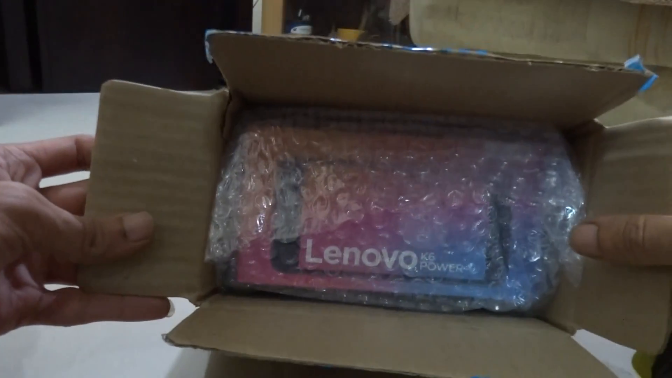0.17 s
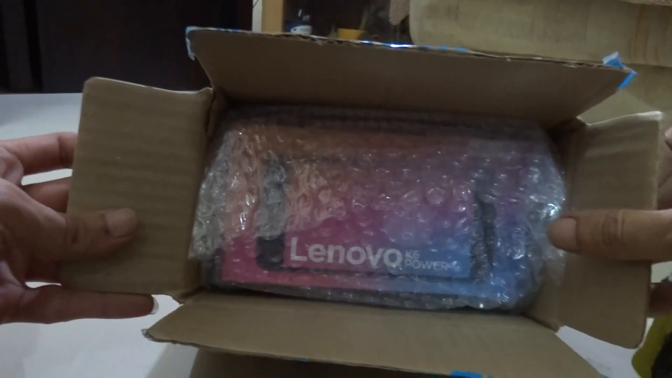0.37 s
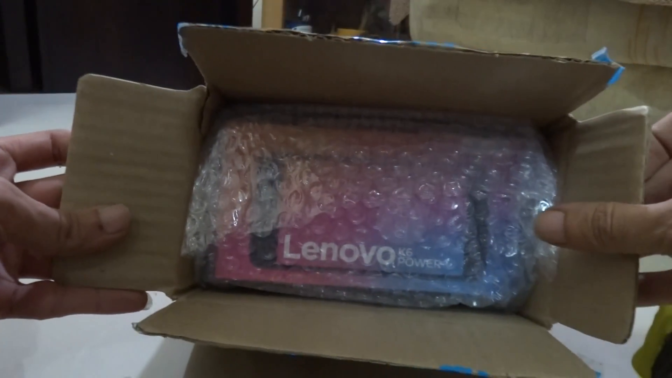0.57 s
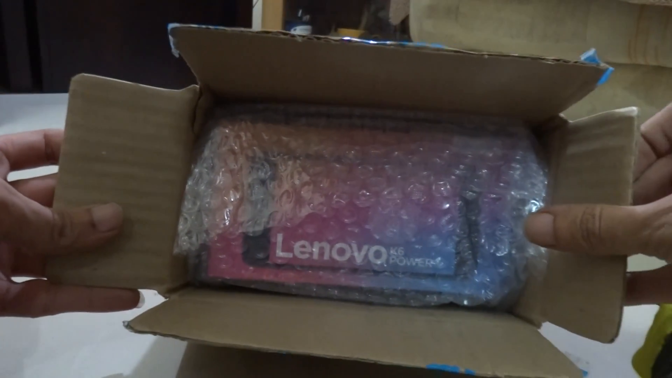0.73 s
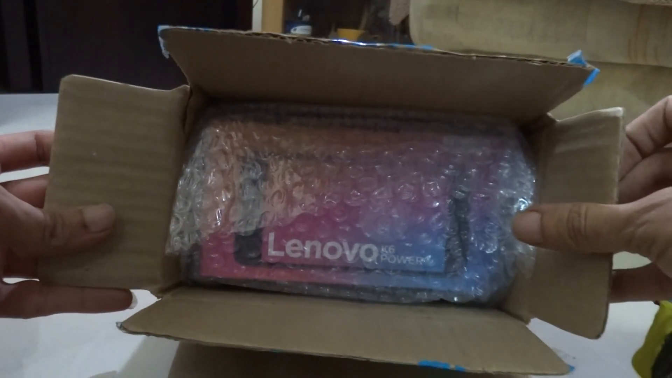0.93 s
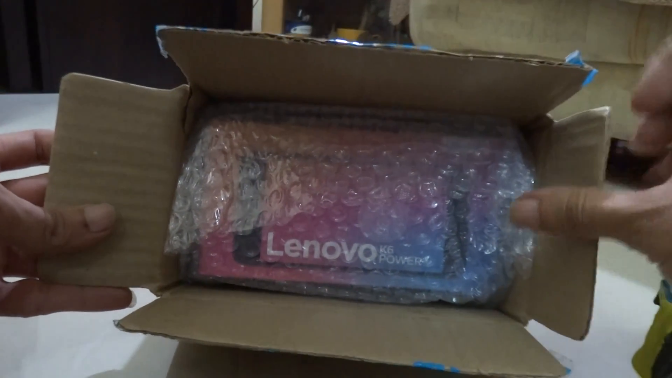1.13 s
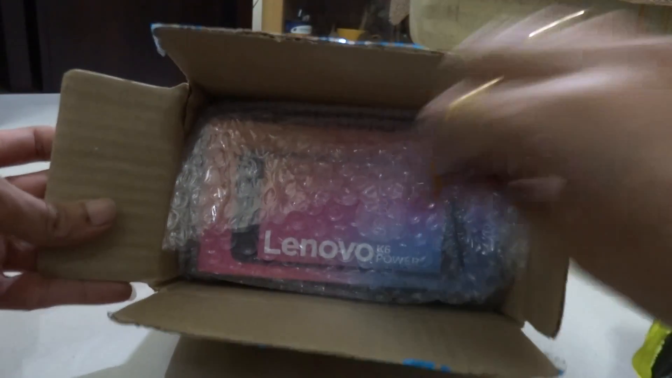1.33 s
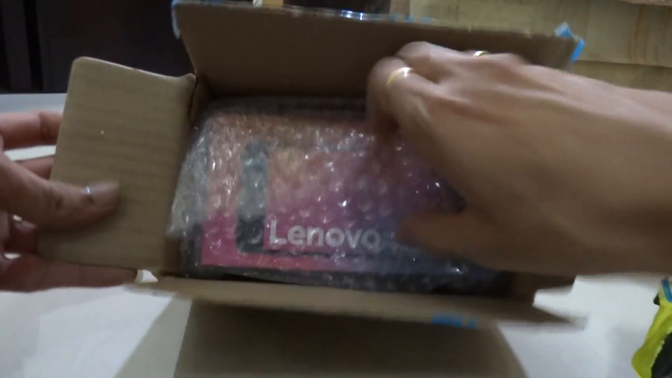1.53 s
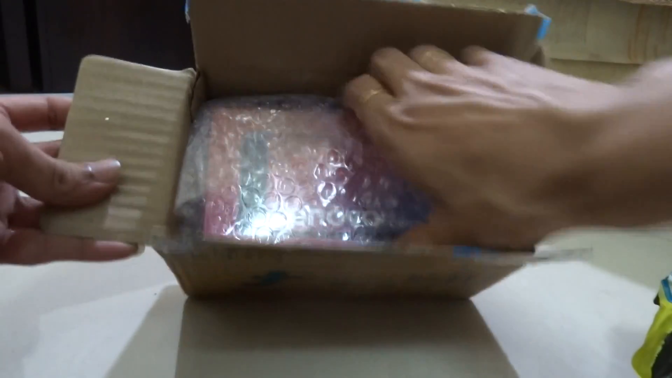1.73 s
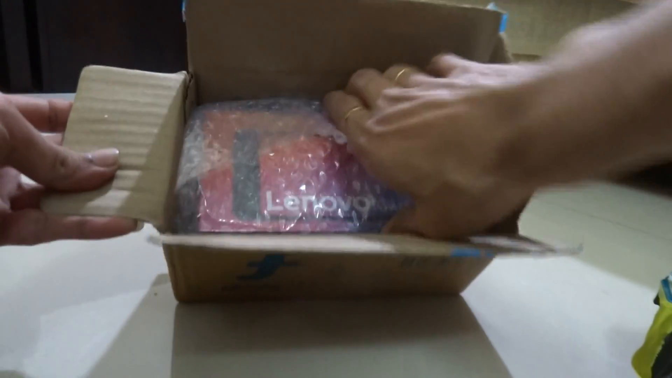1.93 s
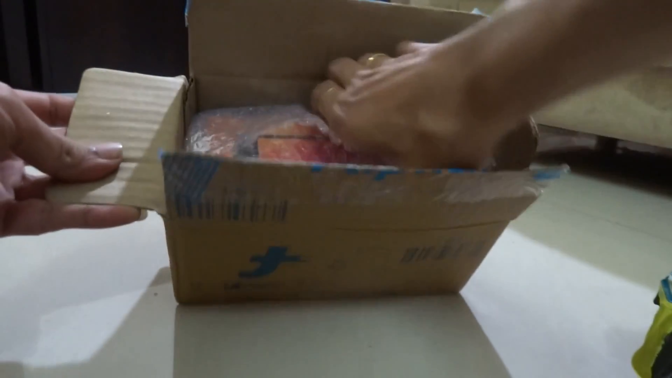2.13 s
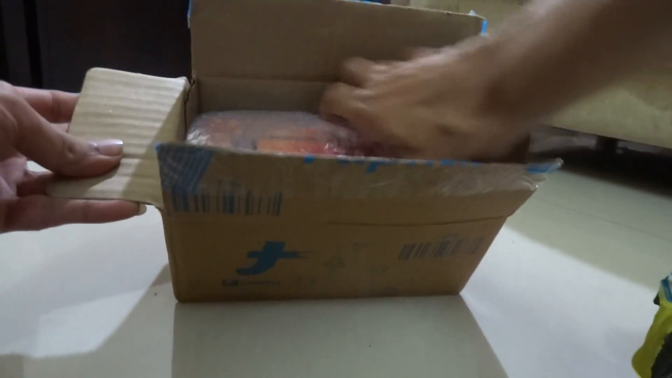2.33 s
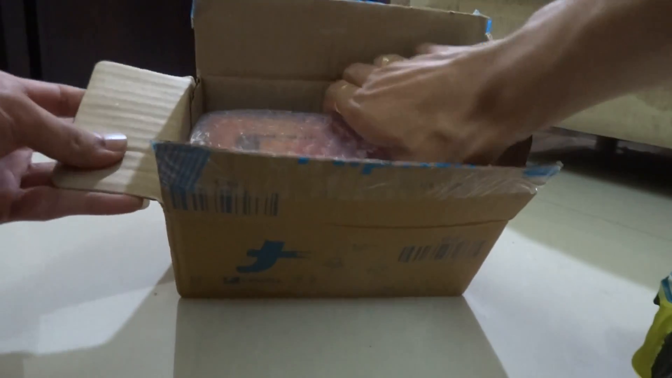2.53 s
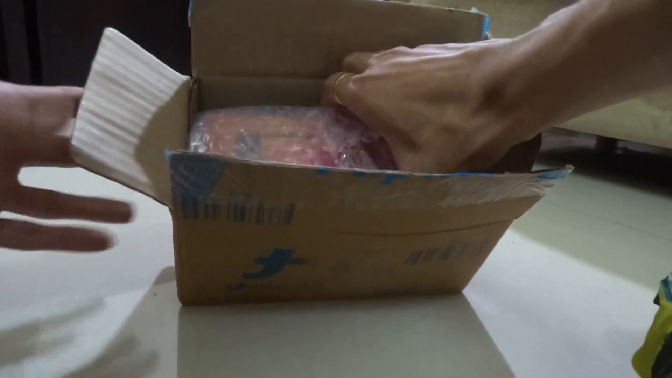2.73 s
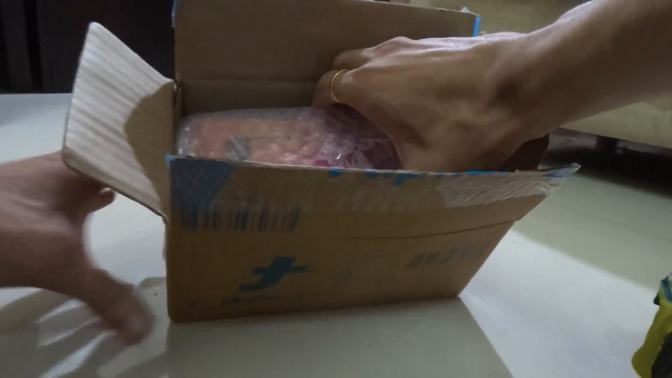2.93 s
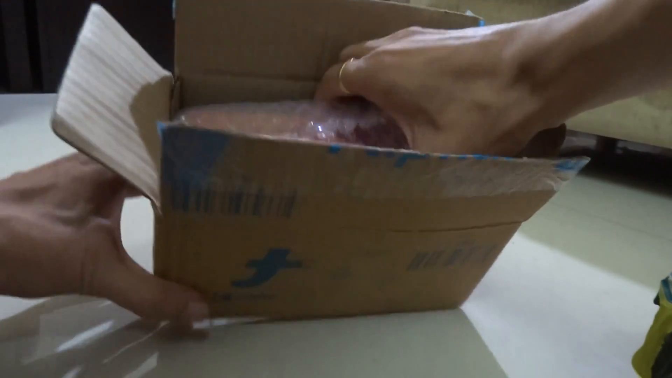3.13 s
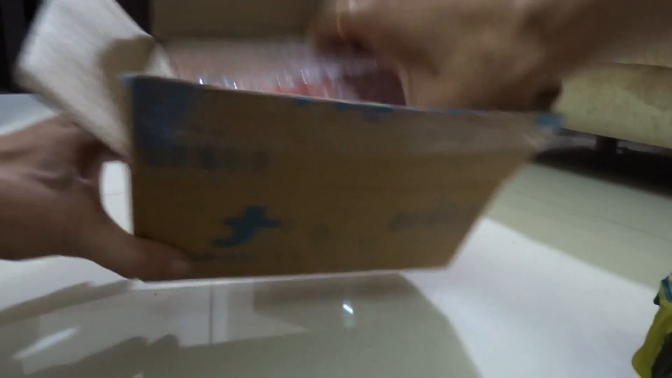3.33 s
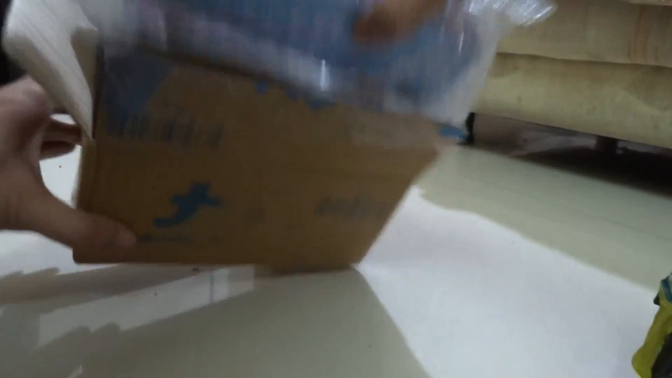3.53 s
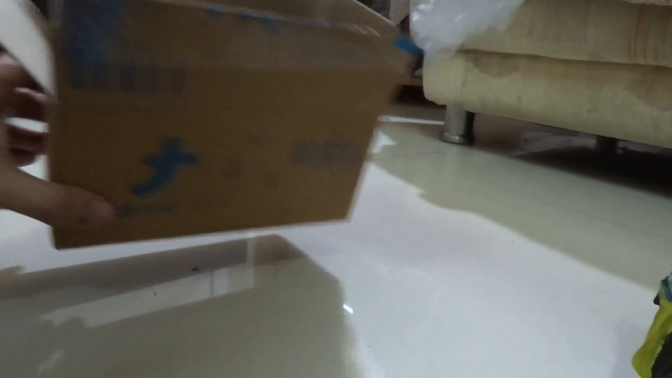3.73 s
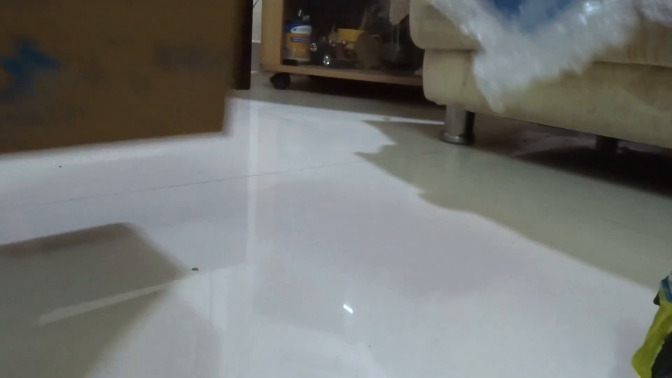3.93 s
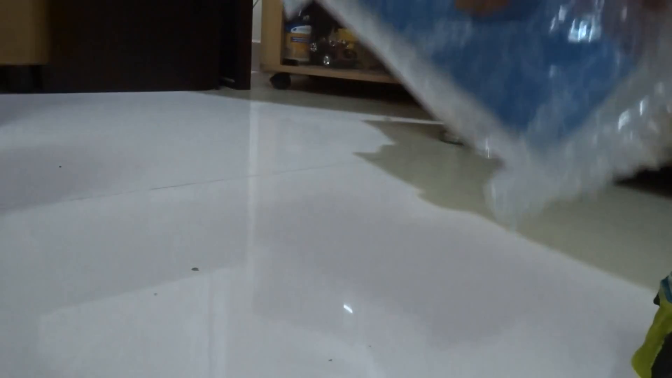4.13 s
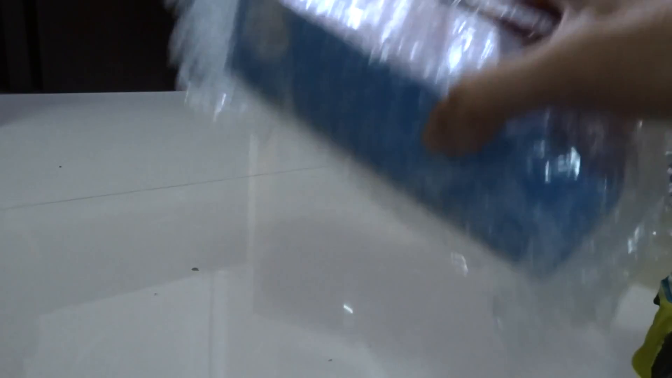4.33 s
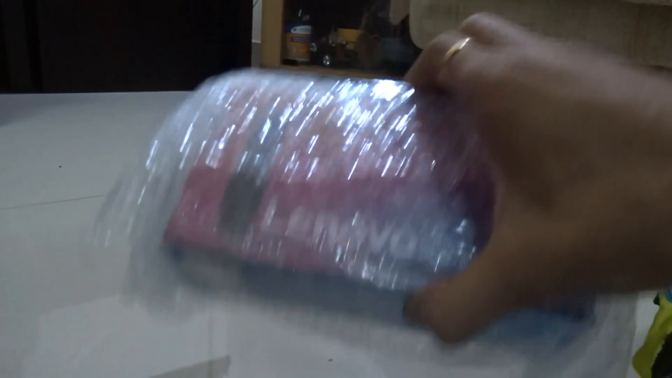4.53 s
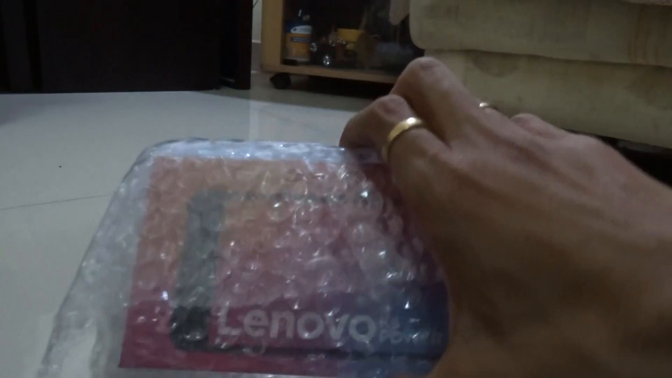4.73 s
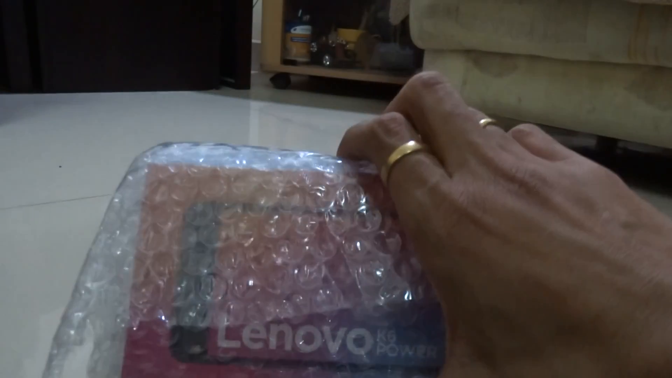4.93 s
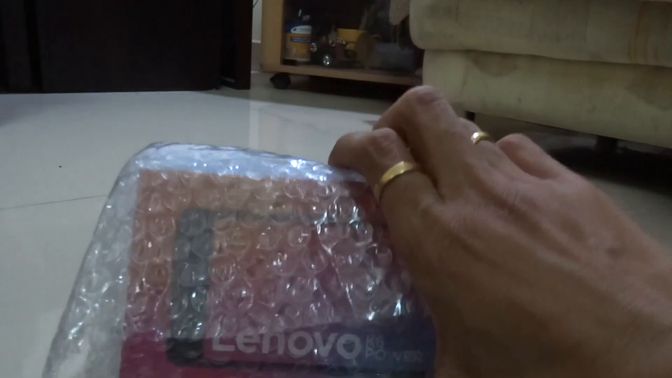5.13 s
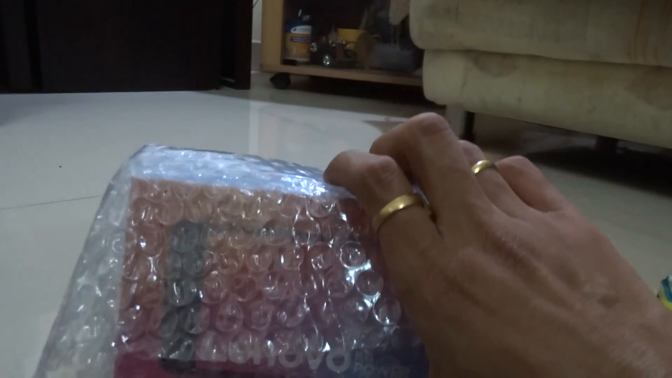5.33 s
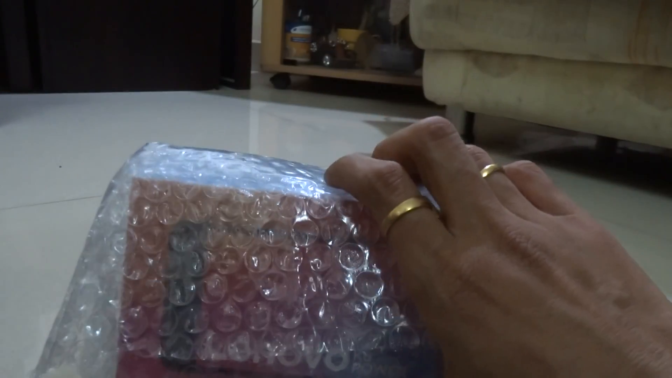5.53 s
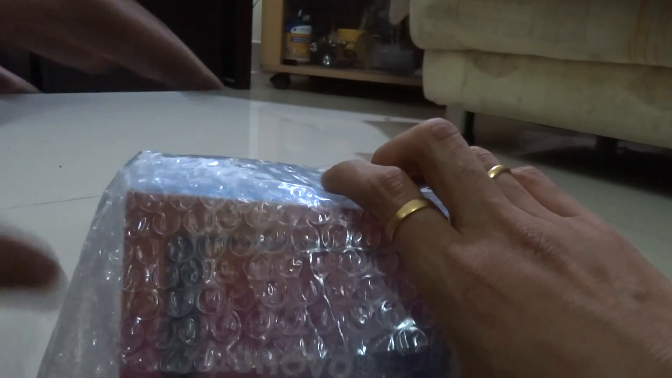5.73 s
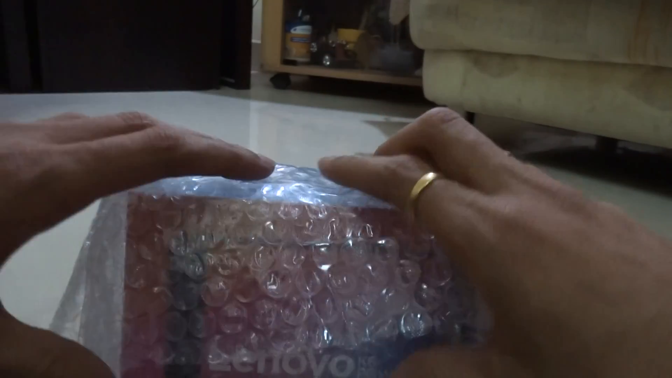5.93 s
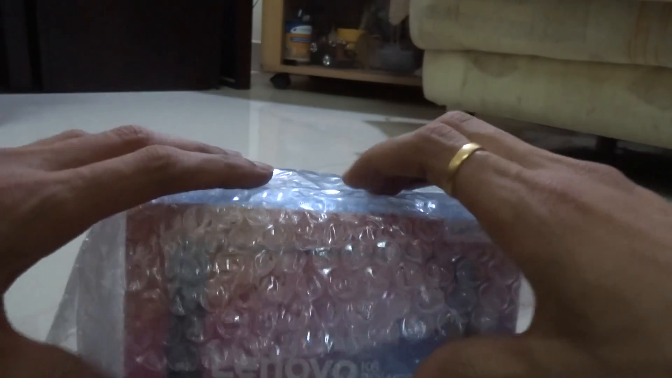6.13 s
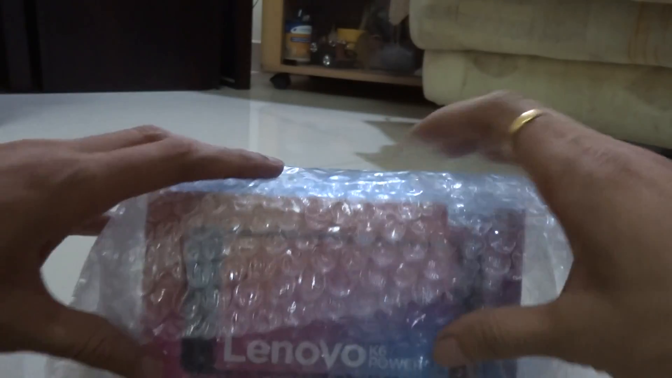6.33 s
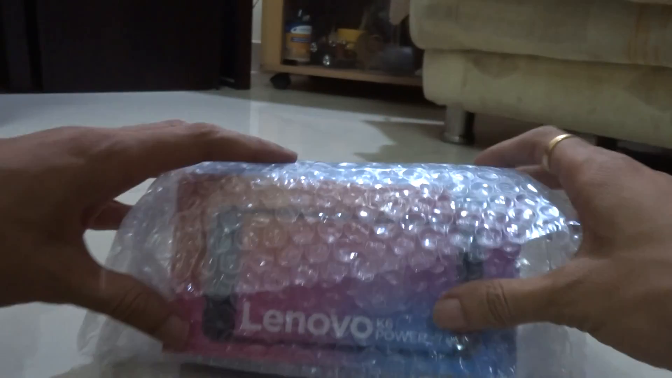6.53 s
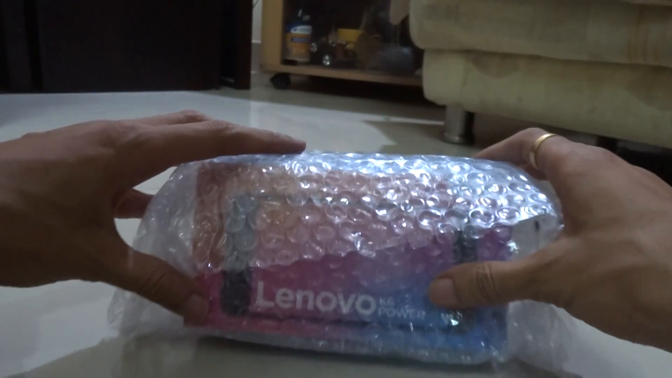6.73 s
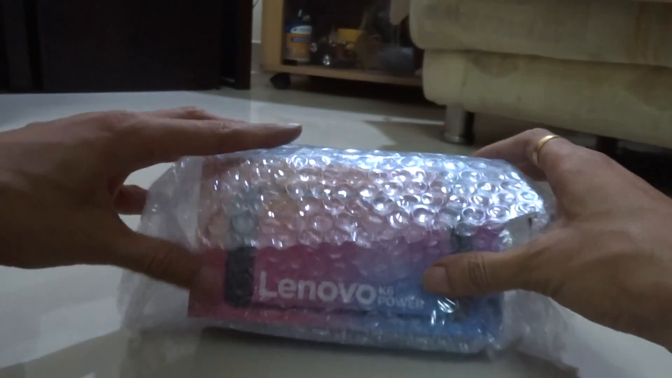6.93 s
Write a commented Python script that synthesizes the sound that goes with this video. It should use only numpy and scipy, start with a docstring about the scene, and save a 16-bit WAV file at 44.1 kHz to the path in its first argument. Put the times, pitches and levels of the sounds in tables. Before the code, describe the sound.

A quiet indoor room with steady soft hiss and a faint wavering appliance hum, heard by a close microphone, nearly mono with very short reflections. For the first second there is only light contact: a faint film tick at 0.5 and a soft cardboard rub at 0.7. Around 1.4 a flap edge drags with a brief singing scrape, then a knock at 1.55. From 1.6 to 3.3 bubble wrap crackles densely in bursts, with sharp bright snaps, cardboard rubbing and blunt carton knocks, strongest near 1.7 to 2.6. At 3.4 to 3.5 the parcel is pulled out in a loud rustling sweep with a hollow boom, and another snap and knock at 3.7. Sparse small crackles follow, an airy whistling film slide at 4.2 to 4.4, and a crisp set-down at 4.5. Softer crinkling continues, with a sharp snap at 5.3, a broader squeeze and cardboard rub at 6.2, and gentle crackles to 7.

```python
"""Plastic film crinkles and snaps, fingers rub cardboard and a carton knocks, over a quiet hissing, humming room.
Hands hold the flaps of a small carton on a tiled floor, pull out a parcel in bubble wrap and turn it over.
Film and cardboard are random clicks that ring many resonances; snaps and knocks are single blows,
drags and some thuds are held tones or narrow noise, and the room is coloured noise with sines.
A close microphone hears it nearly in mono."""
import sys
import numpy as np
from scipy import signal
from scipy.fft import rfft, irfft, next_fast_len
from scipy.io import wavfile
from scipy.ndimage import uniform_filter1d

SR = 44100
rng = np.random.default_rng(int(sys.argv[2]) if len(sys.argv) > 2 else 0)


def inscribe(sig):
    """Save sig as 16-bit PCM at rate SR to the path in sys.argv[1].

    A 1-D sig is mono; a 2-D sig holds one channel per row.
    Samples are clipped to [-1, 1] before scaling.
    """
    pcm = np.round(np.clip(np.atleast_2d(sig).T, -1, 1) * 32767)
    wavfile.write(sys.argv[1], SR, pcm.astype(np.int16))


def invert_db(x):
    """Field ratio 10**(x/20) for x, a level in decibels (scalar or array-like)."""
    u = np.asarray(x, float) / 20
    return 10 ** u


N = 311787   # samples in the scene

# How the hands hold things: stroking gives fine even grains, squeezing coarse ones.
# (time [s], unevenness of grain size [dB], lift of low pitches by large folds [dB],
#  carton boom relative to rub [dB])
HAND_GRIP = [(1.3, 2, 0, -27), (1.5, 5, -2, -13), (1.75, 5, 4, -11), (2.1, 5, -2, -12), (3.1, 5.5, 0, -12),
             (3.4, 1.5, -2, -22), (3.65, 4, -3, -16), (3.8, 5, 2, -12), (4.1, 3.5, -3, -10),
             (4.42, 3, -4, -14), (4.53, 1.5, -17, -24), (4.8, 2, 0, -34), (5.3, 3.8, 3, -16),
             (5.5, 4.2, 2, -18), (5.8, 3.5, 3, -32), (6.2, 4, 4.5, -16), (6.8, 3.8, 2, -24)]


def rms_one(x):
    """Scale a sound to an rms level of 1."""
    return x / np.sqrt(np.mean(x ** 2) + 1e-20)


def in_time(rows):
    """Join the rows of a table by straight lines: one curve a column, one value a sample."""
    s, *columns = np.transpose(rows)
    return [np.interp(np.arange(N) / SR, s, column) for column in columns]


def at_hz(points, hz):
    """Read a spectrum between its points, on a log-frequency axis."""
    point_hz, point_db = np.transpose(points)
    return np.interp(np.log(hz), np.log(point_hz), point_db)


def coloured(x, points):
    """Give a sound the colour of a (frequency [Hz], level [dB]) spectrum without shifting its phase."""
    size = next_fast_len(len(x))
    hz = np.maximum(np.arange(size // 2 + 1) * SR / size, 1)
    spectrum = rfft(x, size) * invert_db(at_hz(points, hz))
    return irfft(spectrum, size)[:len(x)]


def resonance(x, hz, width_hz):
    """Ring a two-pole resonance with a gain of 1 at its top; a narrower one rings longer."""
    r = np.exp(-np.pi * width_hz / SR)
    feed = [(1 - r * r) / 2, 0, (r * r - 1) / 2]
    ring = [1, -2 * r * np.cos(2 * np.pi * hz / SR), r * r]
    return signal.lfilter(feed, ring, x + 1e-18)


def drift(rate_hz):
    """Wander slowly by chance, with a spread of 1: noise smoothed twice."""
    r = np.exp(-2 * np.pi * rate_hz / SR)
    noise = rng.standard_normal(N + SR)
    return rms_one(signal.lfilter([1], [1, -2 * r, r * r], noise)[SR:])   # drop the first second


def grains(base_per_s, coarse_db, clump_db):
    """Random clicks in clumps; coarser means fewer, more uneven clicks at about the same mean power."""
    signs = rng.choice([-1, 1], N)
    sizes = invert_db(coarse_db * np.minimum(rng.exponential(1, N), 4)) * signs
    chance = base_per_s * invert_db(-1.5 * coarse_db) / SR   # of a click at each sample
    born = rng.random(N) < chance * invert_db(clump_db * drift(30))
    usual_power = uniform_filter1d(sizes ** 2, size=8001) * chance
    return sizes * born / np.sqrt(usual_power)


def gated(rows):
    """Gain that follows a short level curve and is zero outside it, with softened ends."""
    t = np.arange(N) / SR
    is_on = (t > rows[0][0]) & (t < rows[-1][0])
    return invert_db(in_time(rows)[0]) * uniform_filter1d(1. * is_on, size=300)


def swells(rows, steeper=1):
    """Level in dB of summed swells, each rising and fading at an even number of dB a second."""
    t = np.arange(0, N, 32) / SR
    power = 1e-14
    for s, rise_s, fade_s, db in rows:
        distance = np.where(t < s, (s - t) / rise_s, (t - s) / fade_s)
        power = power + invert_db(db - 10 * steeper * distance) ** 2
    return np.interp(np.arange(N) / SR, t, 10 * np.log10(power))


def room_tone():
    """Steady coloured hiss, wider than the near sounds, and an appliance hum of slightly wavering sines."""
    # colour of the hiss: (frequency [Hz], relative level [dB])
    hiss_colour = [(18, -77), (30, -24), (98, -14.5), (200, -13), (382, -14), (471, -0.5), (551, -7.5),
                   (1010, -10.5), (1940, -7.5), (2730, -13.5), (4980, -9.5), (5540, -14.5), (8640, -1.5),
                   (10900, -33.5), (15800, -46)]
    # side of the hiss relative to its middle: (frequency [Hz], level [dB])
    hiss_width = [(60, 1), (200, -9), (700, -2.5), (2400, 0.5), (7500, -15), (10500, -8), (15500, -20)]
    # tones of the appliance: (pitch [Hz], level around which it wavers [dB])
    hum_tones = [(195, -87.5), (441, -81), (490, -75.5)]
    hiss_db = -69   # rms of the middle
    t = np.arange(N) / SR
    mid_noise, side_noise = rng.standard_normal((2, N))
    mid = coloured(mid_noise, hiss_colour)
    side = coloured(coloured(side_noise, hiss_colour), hiss_width)
    gain = invert_db(hiss_db) / np.std(mid)
    hum = sum(invert_db(db + 2 * drift(6.2)) * np.sin(2 * np.pi * hz * t + drift(3.4)) for hz, db in hum_tones)
    return gain * mid + hum, gain * side


def echoes(x):
    """Reflections off tiles and furniture: a dying noise response of unit energy."""
    t60_s = 0.061   # time to die by 60 dB
    t = np.arange(SR // 4) / SR
    response = rng.standard_normal(len(t)) * invert_db(-60 * t / t60_s) * (t > .002)
    return signal.fftconvolve(x, response / np.sqrt(np.sum(response ** 2)))[:N]


def flap_drag():
    """A flap edge drags: steady friction keeps its modes singing, with a broad rasp above."""
    # loudness of the drag: (time [s], level [dB])
    drag_level = [(1.37, -102), (1.396, -47.5), (1.57, -51)]
    # modes of the flap: (pitch [Hz], relative level [dB])
    flap_modes = [(925.9, -51.5), (1179, -48.5), (1490, -58), (1733, -58), (2213, -56), (2606, -62),
                  (4740, -66)]
    t = np.arange(N) / SR
    clicks = grains(6600, 2.1, clump_db=-2.0)
    tones = sum(invert_db(db + 1.7 * drift(23)) * np.sin(2 * np.pi * hz * t + 0.7 * drift(29))
                for hz, db in flap_modes)
    rasp = rms_one(resonance(clicks, 2000, 2500))
    return gated(drag_level) * (rms_one(tones) + 0.16 * rasp)


def film_slide():
    """Film slides on film with a short airy whistle: noise twice through each resonance of stretched film."""
    # loudness of the whistle: (time [s], level [dB])
    slide_level = [(4.15, -67), (4.21, -54), (4.3, -51.5), (4.35, -55), (4.39, -67)]
    # resonances of the film: (pitch [Hz], width of one pass [Hz], relative level [dB])
    film_modes = [(2240, 53, -10), (2760, 57, -6), (3330, 400, -6), (4120, 300, -9)]
    noise = rng.standard_normal(N)
    whistle = sum(invert_db(db) * resonance(resonance(noise, hz, width_hz), hz, width_hz)
                  for hz, width_hz, db in film_modes)
    return gated(slide_level) * rms_one(whistle)


def single_resonances():
    """A drag or a thud makes one resonance of cardboard or film sound: noise twice through a narrow band."""
    # (peak time [s], time to swell by 10 dB [s], time to fade by 10 dB [s], level [dB], pitch [Hz])
    tone_rows = [(0.7, .12, .09, -55, 2750), (0.7, .12, .09, -55, 4950), (1.2, .07, .07, -63, 2200),
                 (1.2, .07, .07, -64, 3700), (2.045, .05, .025, -51, 270), (3.507, .004, .012, -38, 520),
                 (3.518, .01, .02, -45, 320), (4.81, .08, .08, -50, 3500), (2.13, .05, .1, -47, 1310),
                 (3.47, .08, .012, -38, 1340), (3.72, .015, .025, -45, 760), (4.93, .09, .06, -58, 720),
                 (5.34, .04, .04, -55, 1250), (6.56, .06, .3, -62, 500)]
    width = .1   # of one pass, as a share of the pitch
    noise = rng.standard_normal(N)
    total = 0
    for *swell, hz in tone_rows:
        tone = resonance(resonance(noise, hz, width * hz), hz, width * hz)
        total = total + invert_db(swells([swell])) * rms_one(tone)
    return total


def rumble(level_db):
    """The parcel drags along the walls and the hollow carton booms in uneven bumps."""
    # air and big walls of the carton: (pitch [Hz], width [Hz], relative level [dB])
    hollow_modes = [(119, 26, -26), (204, 13, -1), (285, 40, 3), (370, 270, 3.5)]
    bumps = grains(1500, 4.0, clump_db=2.0)
    boom = sum(invert_db(db) * resonance(bumps, hz, width_hz) for hz, width_hz, db in hollow_modes)
    low_band = signal.butter(3, [112, 600], "band", fs=SR, output="sos")
    return signal.sosfilt(low_band, invert_db(level_db) * rms_one(boom))


def carton(x, scatter_db=0):
    """Panels ring in parallel; where a blow lands decides how strongly each sounds, here by slow chance."""
    # carton panels: (pitch [Hz], width [Hz], level before the scatter [dB])
    panel_modes = [(284, 130, -10), (517, 83, -5), (735, 190, -5.5), (910, 50, 2), (1293, 140, -2),
                   (1855, 180, 1.5), (2160, 220, -4), (2804, 246, 1.5), (4940, 330, -18.5), (6580, 420, -6)]
    total = 0
    for k, (hz, width_hz, db) in enumerate(panel_modes):
        blow = x * invert_db(db + scatter_db * drift(8.5))
        total = total + (-1) ** k * resonance(blow, hz, width_hz)   # neighbours have opposite signs
    return total


def knocks():
    """Blunt knocks on the cardboard: a soft contact sets the panels ringing."""
    # (time [s], level of the one-sample jolt before filtering [dB])
    knock_rows = [(1.557, 4), (1.838, 8), (1.965, -9.5), (1.992, 1.5), (2.003, 5.5), (2.376, 2.5),
                  (2.389, 0.5), (2.818, -2.5), (3.505, 3), (3.713, 1.5), (4.486, -9), (5.167, -10),
                  (6.058, -13.5), (6.155, -10.5)]
    s, db = np.transpose(knock_rows)
    jolts = np.zeros(N)
    jolts[np.round(s * SR).astype(int)] = invert_db(db)
    soft_contact = signal.butter(2, [220, 2200], "band", fs=SR, output="sos")
    return carton(signal.sosfilt(soft_contact, jolts), scatter_db=4.5)


def rub(level_db, coarse_db):
    """Skin and film slip over cardboard (carton or boxed parcel): friction clicks ring the panels by turns."""
    # cardboard colour: (frequency [Hz], relative level [dB])
    card_colour = [(71, -65), (120, -41), (303, -39), (412, -17.5), (808, 11.5), (2000, -3.5), (7000, -4),
                   (12000, -42.5), (15600, -69), (22000, -120)]
    clicks = grains(5000, 0.9 * coarse_db, clump_db=3.0)
    panel_band = signal.butter(2, [200, 7500], "band", fs=SR, output="sos")
    panels = signal.sosfilt(panel_band, carton(clicks, scatter_db=4.5))
    direct = rms_one(coloured(clicks, card_colour))
    return invert_db(level_db + 1.0) * rms_one(0.86 * direct + rms_one(panels))


def snaps():
    """Creases snap: a sharp step and short chatter ring the crease and a neighbour at a chance pitch."""
    # creases that snap: (time of the peak [s], peak level [dB], pitch [Hz])
    snap_rows = [(0.9583, -36, 7200), (1.0406, -39, 5500), (1.4187, -33, 7200), (1.4655, -21, 7600),
                 (1.468, -23, 2000), (1.5585, -23, 2300), (1.5616, -24, 1800), (1.5958, -13, 7500),
                 (1.6146, -18, 7500), (1.6709, -23, 2000), (1.7102, -7, 6400), (1.7691, -14, 7400),
                 (1.8382, -12, 3000), (1.9664, -22, 2400), (1.985, -10, 6200), (1.9921, -13, 2900),
                 (2.0029, -14, 3300), (2.1376, -13, 4400), (2.148, -13, 5500), (2.1983, -19, 6800),
                 (2.2487, -22, 8500), (2.3487, -16, 7600), (2.3722, -20, 7000), (2.399, -13, 7700),
                 (2.4254, -15, 7700), (2.4387, -17, 5200), (2.4439, -13, 8500), (2.5622, -16, 8500),
                 (2.5688, -14, 2700), (2.603, -17, 8600), (2.6549, -18, 8600), (2.7666, -21, 7400),
                 (2.8467, -19, 8200), (2.8744, -18, 4800), (2.9057, -23, 8300), (2.9507, -15, 8500),
                 (3.0839, -18, 7000), (3.214, -18, 2100), (3.218, -9, 8800), (3.2255, -15, 7700),
                 (3.3624, -14, 8200), (3.6999, -21, 1350), (3.7058, -12, 7500), (3.7127, -11, 7000),
                 (3.7777, -23, 5300), (3.7832, -26, 5400), (3.7965, -29, 2800), (3.811, -31, 1280),
                 (3.8285, -29, 9500), (3.8785, -18, 4500), (3.9048, -28, 9000), (3.9288, -16, 5000),
                 (3.9452, -30, 4500), (3.9773, -18, 5000), (3.9875, -28, 8300), (4.0323, -22, 8500),
                 (4.0906, -30, 3050), (4.135, -31, 7500), (4.1706, -28, 8000), (4.1765, -35, 1400),
                 (4.3283, -24, 7500), (4.4865, -18, 5300), (4.4994, -13, 6500), (4.6791, -26, 3700),
                 (4.9725, -24, 4400), (5.1678, -26, 3500), (5.2731, -20, 6500), (5.2785, -22, 3250),
                 (5.2922, -13, 7200), (5.2967, -8, 6200), (5.3839, -27, 3000), (5.4515, -25, 7500),
                 (5.5013, -21, 7000), (5.5127, -19, 4000), (5.528, -19, 6300), (5.5799, -23, 3000),
                 (5.5975, -22, 6500), (5.6098, -24, 2900), (5.7723, -21, 7800), (5.9641, -29, 2700),
                 (6.0582, -20, 2400), (6.1237, -20, 3400), (6.1562, -19, 4500), (6.1775, -21, 7500),
                 (6.1844, -19, 6600), (6.2118, -21, 3500), (6.2404, -22, 3100), (6.6749, -21, 4900),
                 (6.9205, -26, 3500), (6.9686, -22, 8100), (7.0248, -23, 8400), (7.058, -18, 7800)]
    second_hz, second_octaves, second_db = 5000, .4, -5   # neighbour: middle pitch, its spread, level
    film = np.zeros(N + 1000)
    t = np.arange(1000) / SR
    dull = signal.butter(6, 10500, fs=SR, output="sos")
    for (s, peak_db, hz), noise in zip(snap_rows, rng.standard_normal((len(snap_rows), 1001))):
        burst = noise[1:] * 0.33 * invert_db(-60 * t / 0.011)   # chatter dies by 60 dB in 11 ms
        burst[0] = 2.1 * np.sign(burst[0])   # the step
        other_hz = second_hz * 2 ** (second_octaves * np.clip(noise[0], -2, 2))
        first = resonance(resonance(burst, hz, 1.1 * hz), hz, 0.6 * hz)
        second = resonance(resonance(burst, other_hz, 1.2 * other_hz), other_hz, 0.9 * other_hz)
        both = signal.sosfilt(dull, rms_one(first) + invert_db(second_db) * rms_one(second))
        start = round(s * SR) - np.argmax(np.abs(both))
        film[start:start + 1000] += invert_db(peak_db) * both / np.abs(both).max()
    return film[:N]


def crinkle(level_db, depth_db, coarse_db):
    """Film creases flip: each click rings a few cycles at its own pitch; large folds favour low pitches."""
    # film colour: (frequency [Hz], relative level [dB])
    film_colour = [(290, -40), (537, -20), (805, -22.5), (1370, -11.5), (2420, -3), (4500, -3), (8010, 4.5),
                   (12000, -11), (14300, -17), (15800, -18)]
    brighten, usual_db = .3, -38   # harder handling lifts the top: dB per dB above the usual level [dB]
    shift_db = 3.0   # wandering of the colour from band to band
    clicks = grains(14000, coarse_db, clump_db=2.4)
    # fewer, larger creases let go at once
    pops = grains(400, coarse_db, clump_db=4.0) * invert_db(2.16 * coarse_db - 20)
    pitches = np.geomspace(700, 13000, 14)
    dealt = rng.integers(0, 14, N)   # which pitch a click gets
    top_db = brighten * (level_db - usual_db)
    rings = 0
    for k, hz in enumerate(pitches):
        fold_db = depth_db * np.clip(np.log2(5000 / hz), 0, 1)
        colour_db = fold_db + top_db * (hz > 9500) + shift_db * drift(12)
        # a pop spans neighbouring pitches
        strikes = clicks * (dealt == k) + 0.5 * pops * (abs(dealt - k) <= 1)
        rings = rings + resonance(strikes * invert_db(colour_db), hz, 0.29 * hz) * np.sqrt(3000 / hz)
    bare_clicks = 0.095 * invert_db(top_db) * clicks
    return invert_db(level_db + 13.4) * coloured(rings + bare_clicks, film_colour)


def hands():
    """Strokes on top of light contact set the levels of film and cardboard; the carton booms with the rub."""
    # light contact between strokes: (time [s], film crinkle setting [dB], cardboard rub setting [dB])
    touch_rows = [(0.06, -67.5, -82), (0.47, -67, -86), (0.87, -73, -76), (1.11, -70, -85),
                  (1.38, -80, -85), (1.54, -54, -69), (1.65, -51, -53), (2.3, -50, -64), (2.74, -47, -68),
                  (3.14, -56.5, -66), (3.8, -46, -62), (3.87, -51.5, -66), (4.05, -53, -74),
                  (4.275, -50, -66), (4.46, -56, -70), (4.58, -44.5, -70), (5.1, -48, -67), (6.0, -49, -58),
                  (6.44, -46, -53), (6.91, -49, -60)]
    # strokes of a hand: (peak time [s], film's time to swell by 10 dB [s], film's time to fade by 10 dB [s],
    #  film crinkle setting [dB], cardboard rub setting [dB])
    stroke_rows = np.array([(0.506, .025, .3, -57, -58), (0.7, .11, .12, -54.5, -39.5),
                            (1.2, .07, .07, -54.5, -80), (1.412, .01, .1, -60, -62),
                            (1.468, .05, .07, -47, -78), (1.56, .004, .03, -40, -38),
                            (1.6, .03, .05, -39, -56), (1.755, .1, .14, -34, -47),
                            (1.84, .04, .05, -39, -40), (1.999, .035, .06, -32, -41.5),
                            (2.135, .07, .075, -31.5, -40.5), (2.385, .07, .04, -32, -43),
                            (2.443, .04, .03, -31, -55), (2.53, .03, .04, -43, -46),
                            (2.571, .05, .09, -34, -47), (2.67, .04, .04, -38.5, -60),
                            (2.822, .08, .07, -42, -54.5), (2.956, .08, .04, -41, -58),
                            (3.05, .045, .04, -42, -54.5), (3.216, .033, .035, -34, -53),
                            (3.365, .022, .15, -35, -51), (3.44, .07, .1, -25.5, -40),
                            (3.505, .06, .055, -26.5, -44), (3.566, .06, .06, -34, -45),
                            (3.705, .12, .022, -30.5, -48), (4.494, .003, .055, -33, -62),
                            (4.82, .09, .15, -39, -60), (5.185, .025, .07, -43, -54),
                            (5.293, .03, .12, -42, -65), (5.511, .055, .13, -38, -57),
                            (5.884, .3, .15, -45.5, -56), (6.19, .16, .28, -38.5, -46),
                            (6.69, .15, .25, -42, -52.5), (7.07, .12, .1, -38.5, -60)])
    # the parcel bumps or slides along the walls and the hollow carton booms:
    # (peak time [s], time to swell by 10 dB [s], time to fade by 10 dB [s], level before the low band [dB])
    boom_rows = [(1.562, .004, .025, -49), (2.08, .08, .1, -46), (2.392, .012, .025, -50),
                 (2.58, .02, .08, -53), (2.82, .012, .04, -52), (3.452, .006, .02, -45),
                 (3.51, .008, .06, -38)]
    card_steeper = 1.4   # the rub swells and fades faster than the film
    touch_film_db, touch_card_db = in_time(touch_rows)
    coupling_db = in_time(HAND_GRIP)[2]
    film_strokes_db = swells(stroke_rows[:, :4])
    card_strokes_db = swells(stroke_rows[:, [0, 1, 2, 4]], card_steeper)
    film_db = 10 * np.log10(invert_db(touch_film_db) ** 2 + invert_db(film_strokes_db) ** 2)
    card_db = 10 * np.log10(invert_db(touch_card_db) ** 2 + invert_db(card_strokes_db) ** 2)
    boom_db = 10 * np.log10(invert_db(card_db + coupling_db) ** 2 + invert_db(swells(boom_rows)) ** 2)
    return film_db, card_db, boom_db


def scene():
    """Near sounds sit close to the middle, leaning a little right; reflections add to the narrow side."""
    # hands outside the carton sound wider than inside: (time [s], gain of the side [dB])
    spread_rows = [(1.3, 6), (1.6, -1), (3.7, -1.5), (3.9, 6)]
    # colour of the side: (frequency [Hz], level before the spread gain [dB])
    side_colour = [(100, -30), (700, -20), (2400, -23), (4500, -24.5), (8500, -33), (10300, -12.5),
                   (12500, -17), (15500, -19)]
    echo_db = -15.5
    film_db, card_db, boom_db = hands()
    coarse_db, depth_db, _ = in_time(HAND_GRIP)
    near = crinkle(film_db, depth_db, coarse_db) + rub(card_db, coarse_db) + rumble(boom_db)
    near = near + snaps() + knocks() + flap_drag() + film_slide() + single_resonances()
    mid, side = room_tone()
    mid = mid + near + invert_db(echo_db) * echoes(near)
    near_side = coloured(echoes(near) - 0.33 * near, side_colour)   # the minus leans to the right
    side = side + invert_db(in_time(spread_rows)[0]) * near_side
    return np.array([mid + side, mid - side])


def band_limit(x):
    """A steep low-pass at the top of the band."""
    return signal.sosfilt(signal.butter(12, 16470, fs=SR, output="sos"), x)


def record(dry):
    bass_cut = signal.sosfilt(signal.butter(1, 35, "high", fs=SR, output="sos"), dry)
    top_cut = signal.sosfilt(signal.cheby2(14, 60, 16400, fs=SR, output="sos"), bass_cut)
    return band_limit(top_cut)


dry = scene()
out = record(dry)
inscribe(out)
```